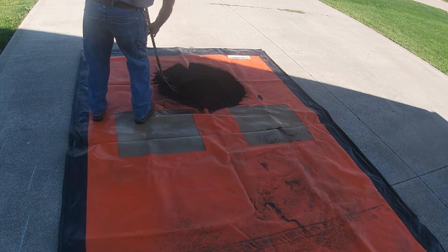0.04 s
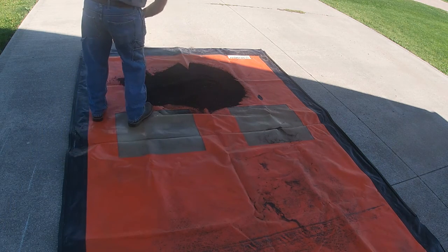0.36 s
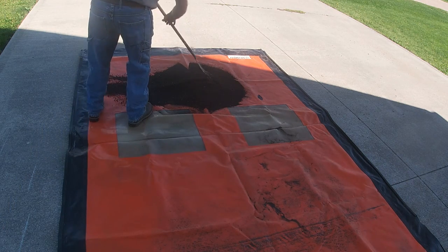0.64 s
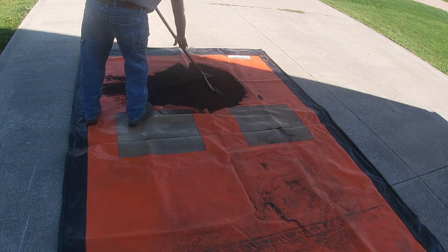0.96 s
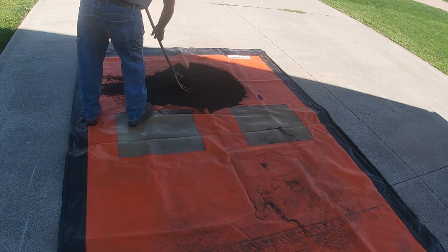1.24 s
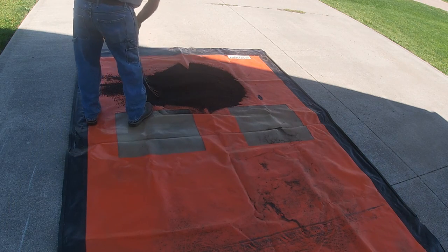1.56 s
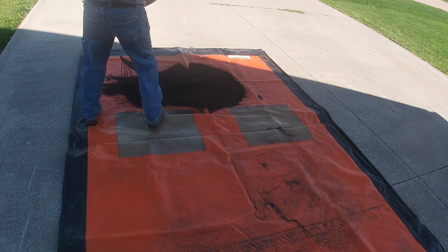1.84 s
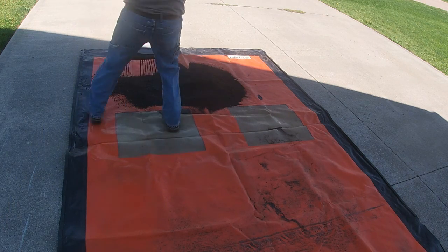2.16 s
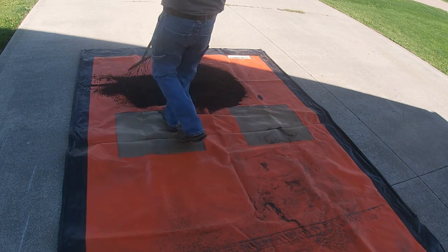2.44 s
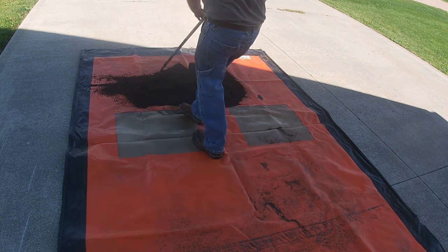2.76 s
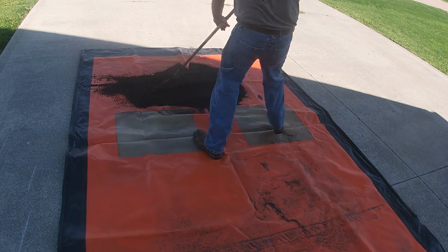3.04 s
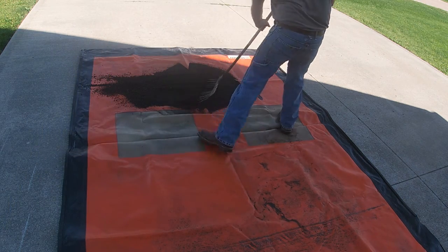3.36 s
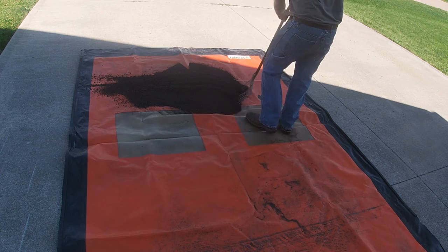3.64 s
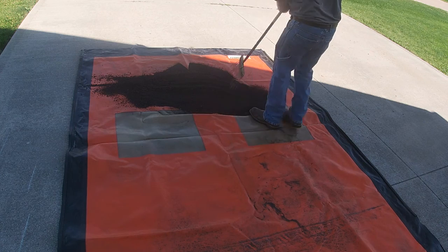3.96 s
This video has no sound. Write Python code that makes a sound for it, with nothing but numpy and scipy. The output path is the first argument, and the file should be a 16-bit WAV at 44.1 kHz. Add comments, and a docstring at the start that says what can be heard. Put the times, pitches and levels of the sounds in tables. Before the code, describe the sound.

Gritty rake scrapes through soil on a tarp, with scuffing steps and light wind outdoors.

```python
"""A rake drags through a heap of loose dirt on a plastic tarp on a driveway.
Its tines grind through soil, tick on stones and make the tarp ring; dirt sprinkles down.
The man raking then steps sideways: his shoes slide and scuff, and the sheet crackles.
Wind bumps the microphone in the second half; far away a machine hums and small birds chirp.
The gritty sounds are thousands of tiny random clicks, filtered and faded in and out."""
import sys
import numpy as np
from scipy import signal
from scipy.fft import rfft, irfft
from scipy.io import wavfile
from scipy.ndimage import uniform_filter1d

SR = 44100
rng = np.random.default_rng(int(sys.argv[2]) if len(sys.argv) > 2 else 0)


def dump(signal):
    """Clip the signal to [-1, 1] and save it as 16-bit WAV at the path in sys.argv[1]."""
    limited = np.clip(np.atleast_2d(signal).T, -1, 1)
    pcm = np.round(limited * 32767).astype(np.int16)
    wavfile.write(sys.argv[1], SR, pcm)


N = 176400  # 4 seconds
T = np.arange(N) / SR

# Kinds of grit: clicks each second, and how much their sizes vary.
DIRT = dict(per_s=9000, spread_db=1.5)
FINE = dict(per_s=9000, spread_db=-0.5)
UNDERFOOT = dict(per_s=2700, spread_db=2)
STONES = dict(per_s=140, spread_db=2)


def amp(db):
    """Turns decibels into a gain."""
    return 10 ** (np.asarray(db) / 20)


def unit(x):
    """Scales a signal to an average (rms) size of 1."""
    return x / np.sqrt(np.mean(x ** 2) + 1e-20)


def curve(points):
    """Joins (time_s, value) points with straight lines."""
    return np.interp(T, *np.transpose(points))


def coloured(x, colour, tilt=0):
    """Shapes the lows and highs of x, at size 1; a positive tilt (dB per octave) brightens it."""
    hz = np.fft.rfftfreq(N, 1 / SR)
    points_hz, points_db = np.transpose(colour)
    db = np.interp(np.log(hz + 1), np.log(points_hz), points_db)
    octaves = np.log2(np.maximum(hz, 200) / 1500)
    return unit(irfft(rfft(x) * amp(db + tilt * octaves), N))


def wander(hz):
    """A smooth random wobble, mostly slower than hz."""
    f = np.fft.rfftfreq(N, 1 / SR)
    return unit(irfft(rfft(rng.standard_normal(N)) / (1 + (f / hz) ** 4), N))


def grains(per_s, spread_db):
    """Random clicks whose strength flutters as the contact judders."""
    size = amp(spread_db * np.minimum(rng.exponential(1, N), 4))
    clicks = rng.choice([-1, 1], N) * (rng.random(N) < per_s / SR)
    judder_db = 0.5 * wander(hz=72.6)
    return size * clicks * amp(judder_db)


def resonate(x, hz, width_hz):
    """Makes x ring around the pitch curve hz; a narrower width gives a clearer note."""
    turn = np.exp(2j * np.pi * np.cumsum(hz) / SR)
    r = np.exp(-np.pi * width_hz / SR)
    return unit((turn * signal.lfilter([1], [1, -2 * r, r * r], x / turn)).real)


def swell(peak, rise, fall, db):
    """Fades in and out; rise and fall are the seconds between the peak and 20 dB below it."""
    away = np.maximum((peak - T) / rise, (T - peak) / fall)
    return amp(db - 20 * np.minimum(away, 10) ** 1.45)


def strokes(table, colour, grit):
    """Plays one swell of filtered clicks for each row of a table."""
    out, clicks = np.zeros(N), grains(**grit)
    for peak, rise, fall, db, tilt in table:
        shifted = np.roll(clicks, rng.integers(N))
        out += swell(peak, rise, fall, db) * coloured(shifted, colour, tilt)
    return out


# Tone of the background hiss: frequency_hz, relative_db
HISS_COLOUR = [(30, 22.5), (100, 16.5), (200, 18), (290, 5), (450, 2.5), (900, 1.5), (1800, -2.5),
               (3500, -6.5), (5000, -2.5), (7000, -6.5), (8400, 0), (9400, 4.5), (10100, -12.5),
               (11500, -24), (15000, -25)]

def hiss():
    """Soft background hiss with a faint random flicker across its pitches."""
    noise = coloured(rng.standard_normal(N), HISS_COLOUR)
    bands = signal.stft(noise, nperseg=512)[2]
    flicker = uniform_filter1d(rng.standard_normal(bands.shape), size=7, axis=0)  # smooth over pitch
    flicker_db = 3 * unit(uniform_filter1d(flicker, size=14, axis=1))  # and over time
    return amp(-50.5) * signal.istft(bands * amp(flicker_db), nperseg=512)[1][:N]


# The machine's low tones: pitch_hz, level_db
HUM_TONES = [(59.5, -56), (89, -62), (149.7, -55), (180, -63.5), (197.5, -57.5), (243, -66)]

def machine():
    """A distant machine hums, each tone wavering on its own."""
    out = np.zeros(N)
    for hz, db in HUM_TONES:
        waver = 1 + 0.28 * (wander(hz=2.8) + 1j * wander(hz=9.0))
        out += amp(db) * unit((waver * np.exp(2j * np.pi * hz * T)).real)
    return out


# Bird chirps (a negative fall glides up): start_s, length_s, pitch_hz, fall_hz, level_db
BIRD_CHIRPS = [(1.455, 0.033, 3800, -700, -55), (1.459, 0.019, 4700, 500, -52),
               (1.472, 0.032, 3800, 300, -49), (1.512, 0.026, 4170, 600, -54),
               (1.802, 0.057, 3770, 53, -54), (1.865, 0.038, 4700, 550, -55),
               (1.908, 0.037, 4680, 550, -58.5), (2.302, .032, 4680, 607, -58),
               (2.348, .032, 4650, 603, -59), (2.403, 0.04, 4670, 650, -56),
               (2.803, 0.055, 3040, -600, -53.5), (2.812, 0.028, 4650, 500, -59),
               (2.822, 0.044, 4100, 706, -55), (2.848, 0.023, 3530, -300, -52),
               (2.858, 0.024, 4570, 600, -61), (2.869, 0.051, 3460, 650, -52),
               (2.907, 0.035, 4700, 500, -52.5), (2.908, .03, 4080, 150, -56)]

def birds():
    """Far birds sing short, raspy glides, blurred by echoes of the yard."""
    out = np.zeros(N)
    rasp = 1 + 0.41 * (wander(hz=300) + 1j * wander(hz=300))
    for start, length, hz, fall_hz, db in BIRD_CHIRPS:
        progress = np.clip((T - start) / length, 0, 1)
        pitch = hz - fall_hz * progress ** 2
        tone = unit((rasp * np.exp(2j * np.pi * np.cumsum(pitch) / SR)).real)
        out += amp(db) * np.sin(np.pi * progress) * tone
    echo = rng.standard_normal(SR // 2) * np.exp(-T[:SR // 2] / 0.03)
    return out + 0.25 * signal.fftconvolve(out, echo / np.linalg.norm(echo))[:N]


# Strength of the wind: time_s, level_db
WIND_LEVELS = [(0, -55), (2.1, -50), (2.27, -32), (2.34, -47), (2.48, -29.5), (2.62, -40), (2.73, -42.5),
               (2.94, -46), (3.03, -30), (3.42, -31.5), (3.56, -37), (3.75, -45), (3.88, -33), (4, -32.5)]
# Tone of its rumble: frequency_hz, relative_db
RUMBLE_COLOUR = [(10, -5), (25, 1.5), (45, 4), (70, -8), (110, -17), (200, -29), (500, -71), (2000, -90)]
# Sharp bumps of air: peak_s, level_db, half_width_s
WIND_BUMPS = [(2.545, -32, 0.0034), (3.026, -23.5, 0.0075), (3.122, -18.5, 0.0046), (3.334, -28, 0.0029),
              (3.391, -12.5, 0.0041), (3.417, -11, 0.003), (3.486, -14.5, 0.0037), (3.508, -21.5, 0.0025),
              (3.518, -22.5, 0.0026), (3.629, -23, 0.0019), (3.65, -23, 0.0024)]

def wind():
    """Wind rumbles on the microphone; single swirls give it a push between two small pulls."""
    out = amp(curve(WIND_LEVELS)) * coloured(rng.standard_normal(N), RUMBLE_COLOUR)
    for peak, db, half_width in WIND_BUMPS:
        away = (T - peak) / half_width
        out += amp(db) * (1 - away ** 2) * np.exp(-away ** 2 / 2)
    return out


# Soles sliding: peak_s, rise_s, fall_s, level_db, tilt_db_per_octave
SOLE_SLIDES = [(1.966, .002, 0.095, -45.5, -.5), (2.055, 0.077, 0.053, -44.5, 0),
               (2.237, 0.047, 0.039, -48, -0.5), (2.638, 0.093, 0.059, -42.5, -2),
               (2.74, 0.077, 0.16, -48.5, -1.5)]
# Tone of a slide: frequency_hz, relative_db
SOLE_COLOUR = [(200, -1), (700, 2.5), (1700, -0.5), (3600, 5), (5500, -2), (7500, -13), (10000, -19),
               (15000, -48)]
# Soles pressing on grit: peak_s, rise_s, fall_s, level_db, tilt_db_per_octave
CRUNCHES = [(2.09, 0.044, 0.079, -41.5, -1.5), (2.177, 0.0088, 0.047, -40.5, -2.5),
            (2.549, 0.0021, 0.041, -38.5, -3.5), (2.647, 0.029, 0.062, -46, 1.5),
            (2.69, 0.029, 0.087, -42, 3), (2.98, 0.03, 0.04, -47.5, 2.5), (3.19, 0.02, 0.12, -47, -2),
            (3.305, 0.042, 0.064, -44, -2), (3.337, 0.0092, 0.015, -29, -12),
            (3.512, 0.013, 0.067, -45.5, -3), (3.585, 0.014, 0.019, -42.5, -1),
            (3.695, 0.16, 0.09, -42, -11.5), (3.82, 0.052, 0.033, -41, -9)]
# Tone of a step on the tarp: frequency_hz, relative_db
CRUNCH_COLOUR = [(100, -5), (270, -7), (360, -2), (435, 7.5), (540, -2.5), (760, 2), (1100, -7),
                 (1800, -7.5), (3200, -18.5), (7000, -26), (15000, -56)]

def shoes():
    """Soles slide, then crunch down on grit."""
    return strokes(SOLE_SLIDES, SOLE_COLOUR, FINE) + strokes(CRUNCHES, CRUNCH_COLOUR, UNDERFOOT)


# Rubber soles juddering: peak_s, rise_s, fall_s, level_db, pitch_hz
SOLE_SCUFFS = [(2.1, .045, 0.036, -49, 680), (2.606, 0.055, .04, -47.5, 784),
               (2.648, 0.021, 0.038, -38, 800), (2.686, 0.03, 0.031, -42, 660),
               (3.818, 0.028, .025, -41, 684)]

def scuffs():
    """A twisting sole sticks and slips on the sheet with a short, hollow croak."""
    out = np.zeros(N)
    for peak, rise, fall, db, hz in SOLE_SCUFFS:
        croak = resonate(grains(**UNDERFOOT), np.full(N, hz), width_hz=340)
        out += swell(peak, rise, fall, db) * croak
    return out


# Single snaps and knocks: start_s, level_db, pitch_hz, ring_cycles
TARP_SNAPS = [(.901, -37.5, 1820, 3.4), (2.082, -31.5, 1470, 2.6), (2.097, -34.5, 730, 2.1),
              (2.162, -28.5, 2050, 1.6), (2.173, -27.5, 790, 0.76), (2.547, -38, 1200, 1.2),
              (2.556, -33, 560, 1.1), (2.638, -20, 1030, 0.73), (2.645, -25.5, 1770, 1.6),
              (2.646, -29, 820, 1.6), (2.664, -30.5, 795, 2.8), (2.677, -30, 644, 2.8),
              (2.683, -30, 2200, 2), (2.69, -31, 1450, 2.5), (2.699, -27, 5000, 14),
              (2.959, -37.5, 2550, 15), (3.332, -33, 1020, .9), (3.336, -34, 460, 2.5),
              (3.511, -36, 1100, 1.2), (3.699, -33, 1050, 2.4), (3.77, -26, 786, 0.96),
              (3.817, -30, 730, 3.8), (3.851, -24, 3570, 0.47)]

def snaps():
    """Tarp and grit snap: a note that dies almost at once, with a dull crack on top."""
    out, t = np.zeros(N), T[:2048]
    dull = signal.butter(3, 3350, fs=SR)
    for start, db, hz, cycles in TARP_SNAPS:
        ring = np.sin(2 * np.pi * hz * t) * np.exp(-t * hz / cycles)
        crack = unit(signal.lfilter(*dull, rng.standard_normal(len(t)))) * np.exp(-t / 0.0014)
        out[round(start * SR):][:len(t)] += amp(db) * (ring + 0.38 * crack)
    return signal.lfilter(*signal.butter(2, [417, 6500], "bandpass", fs=SR), out)


# Quick crinkles: peak_s, rise_s, fall_s, level_db, tilt_db_per_octave
TARP_CRINKLES = [(.946, 0.037, 0.074, -48, 0.5), (.998, 0.032, 0.032, -44, -0.5),
                 (1.832, 0.016, 0.038, -50, 1.5), (2.63, 0.005, 0.032, -46.5, 1),
                 (2.7, 0.0039, 0.01, -37.5, -3), (2.716, 0.005, 0.023, -44, -2.5),
                 (2.959, .003, 0.016, -37.5, -2.5), (2.97, 0.086, 0.089, -47, -2.5)]
# Tone of the plastic: frequency_hz, relative_db
PLASTIC_COLOUR = [(200, -7.5), (1000, -30), (2300, -8), (3000, 0), (4200, -2.5), (5100, 0.5), (7500, -6),
                  (10000, 0.5), (11500, -18.5), (15000, -22)]

def crinkles():
    """The sheet crinkles, and the sound bounces off the ground a millisecond later."""
    direct = strokes(TARP_CRINKLES, PLASTIC_COLOUR, FINE)
    return direct + 0.4 * np.interp(T - 0.001, T, direct)


# Showers of soil: peak_s, rise_s, fall_s, level_db, tilt_db_per_octave
SOIL_SHOWERS = [(.01, 0.081, 0.086, -49.5, 0), (.38, 0.61, 0.26, -50.5, 4), (.665, 0.024, 0.01, -49, -4),
                (1.2, 0.23, 0.28, -47, 3.5), (1.66, 1, 0.23, -52, 0), (2.845, 0.045, 0.056, -51, 1),
                (3.37, 0.36, 0.9, -50, 1.5), (3.8, 0.12, 0.075, -40.5, 2.5), (3.885, 0.011, 0.025, -47, 3)]
# Tone of a shower: frequency_hz, relative_db
SHOWER_COLOUR = [(200, -50), (1000, -21), (2500, -9), (3500, -5.5), (4500, -7.5), (7500, -15.5),
                 (9600, -10.5), (11200, -26), (15000, -38.5)]

def soil():
    """Fine soil patters onto the plastic."""
    return strokes(SOIL_SHOWERS, SHOWER_COLOUR, FINE)


# Thin rasps of the tines: peak_s, half_length_s, level_db, pitch_hz
TINE_RASPS = [(0.944, .03, -48.5, 3240), (0.999, 0.021, -51.5, 3480), (1.148, 0.17, -52.5, 3580),
              (3.28, .04, -51.5, 3380), (3.357, 0.058, -48.5, 3780)]

def rasps():
    """Tines skim the tarp's weave; the pitch rises as they speed up."""
    out, rise_hz_per_s = np.zeros(N), 710
    for peak, half, db, hz in TINE_RASPS:
        pitch = hz + rise_hz_per_s * np.clip(T - peak, -half, half)
        fade = np.exp(-2 * ((T - peak) / half) ** 2)
        out += amp(db) * fade * resonate(grains(**FINE), pitch, width_hz=750)
    return out


# Strength of the long first pull: time_s, relative_db
LONG_PULL = [(.06, -55.5), (.16, -46.5), (.23, -35.5), (.29, -35.5), (.36, -32.5), (.43, -36.5),
             (.55, -39.5), (.63, -40.5), (.77, -47.5), (.9, -55.5), (.97, -66)]
# The tarp's lower ring, rising as the rake comes in: time_s, pitch_hz, level_db
LOW_RING = [(.1, 820, -65), (.22, 820, -47.5), (.285, 884, -34), (.37, 916, -33), (.47, 970, -38),
            (.57, 950, -40.5), (.615, 1000, -51.5), (.69, 925, -50.5), (.88, 1154, -74.5)]
# Its upper ring, clearest as the tines bite and lift: time_s, pitch_hz, level_db
HIGH_RING = [(.08, 1550, -68), (.17, 1490, -44.5), (.35, 1560, -38.5), (.47, 1580, -49), (.54, 1580, -59),
             (.67, 1710, -54), (.76, 1470, -47), (.83, 1560, -53.5), (.94, 1770, -71)]
# Shorter drags: peak_s, rise_s, fall_s, level_db, tilt_db_per_octave
SHORT_DRAGS = [(.0, .1, 0.14, -54.5, -0.5), (.76, 0.07, 0.15, -48, 2), (1.05, 0.3, 0.39, -55.5, 0),
               (1.59, 0.18, 0.51, -47, -3.5), (1.745, 0.046, 0.042, -44.5, -7),
               (2.86, 0.2, 0.49, -56.5, 3.5), (3.2, 0.12, 0.13, -52, 2.5), (3.49, 0.28, 0.21, -45.5, -3),
               (3.7, 0.18, 0.14, -45.5, -4.5), (3.8, 0.13, 0.12, -38, -2.5), (3.92, 0.093, 0.29, -48, 0.5)]
# Tone of tines in dirt: frequency_hz, relative_db
SCRAPE_COLOUR = [(100, -12), (290, -21.5), (440, -3), (750, -4), (1100, 0.5), (1600, -1.5), (2200, -2),
                 (3600, -3), (5200, -12), (7500, -23), (9400, -38), (11500, -58), (15000, -70)]
# Tone of tines on small stones: frequency_hz, relative_db
TICK_COLOUR = [(200, -8), (500, -6), (1300, -4), (2800, -3.5), (5000, -6.5), (8000, -22), (15000, -55)]

def rake():
    """Tines grind through dirt: the long pull rings the tarp, and shorter drags tick on stones."""
    pull = coloured(grains(**DIRT), SCRAPE_COLOUR) * amp(curve(LONG_PULL) - 2.1)
    for ring, width_hz in (LOW_RING, 303), (HIGH_RING, 390):
        times, hz, db = np.transpose(ring)
        pitch = np.interp(T, times, hz)
        pull += amp(np.interp(T, times, db)) * resonate(grains(**DIRT), pitch, width_hz)
    stones = amp(-6) * strokes(SHORT_DRAGS, TICK_COLOUR, STONES)
    return pull + stones + strokes(SHORT_DRAGS, SCRAPE_COLOUR, DIRT)


def scene():
    """Adds all the sounds together in one channel."""
    work = rake() + rasps() + crinkles() + soil() + shoes() + scuffs() + snaps()
    return (work + birds() + wind() + machine() + hiss())[None]


def record(dry):
    """Cuts off the highest treble, above 15400 Hz."""
    lowpass = signal.firwin(255, 15400, window=("kaiser", 9), fs=SR)
    return signal.oaconvolve(dry, lowpass[None], "same")


dry = scene()
out = record(dry)
dump(out)
```